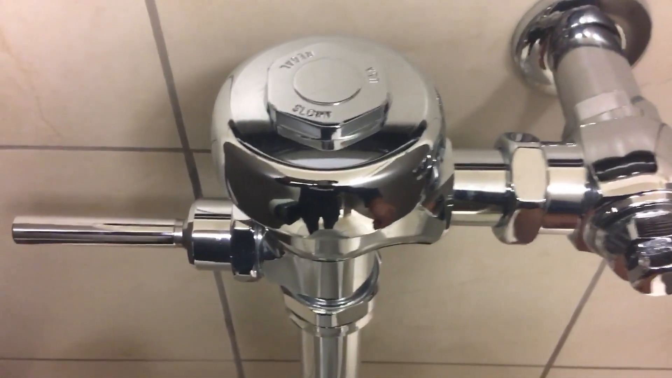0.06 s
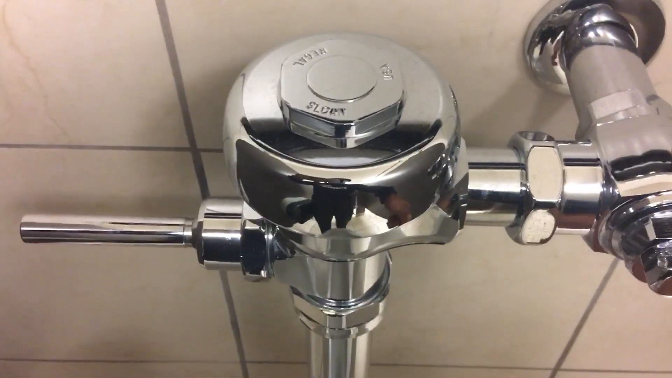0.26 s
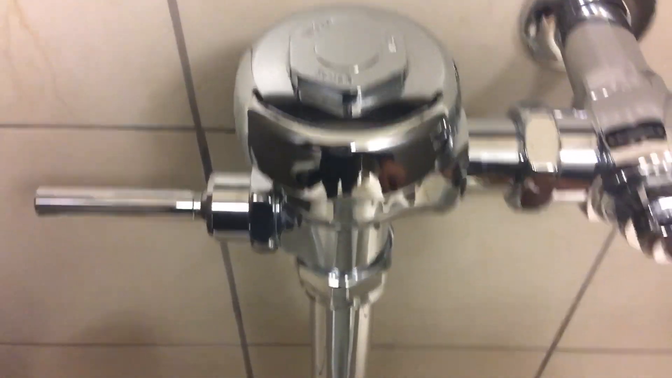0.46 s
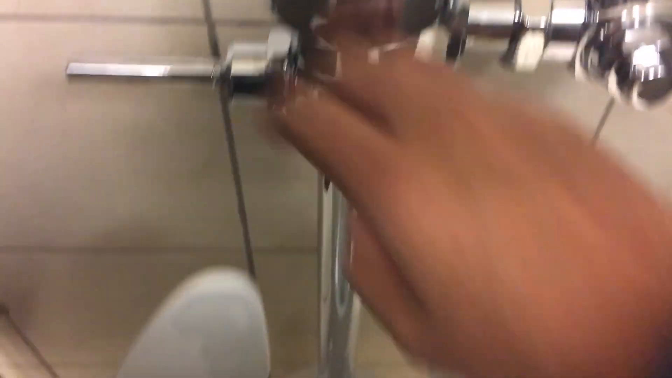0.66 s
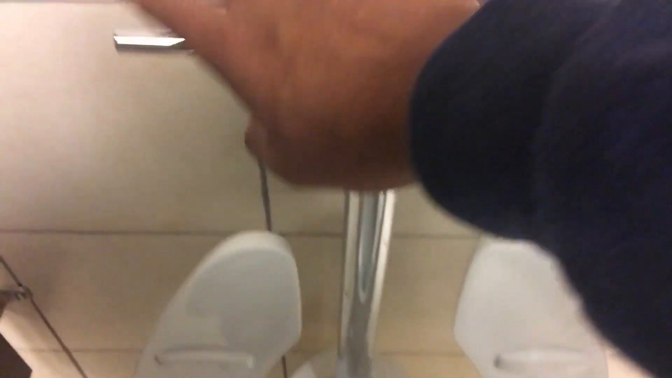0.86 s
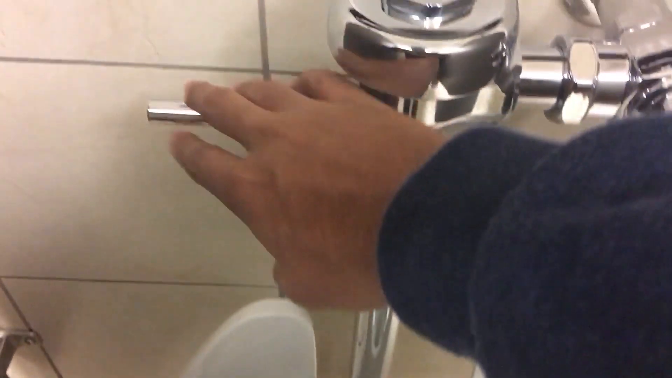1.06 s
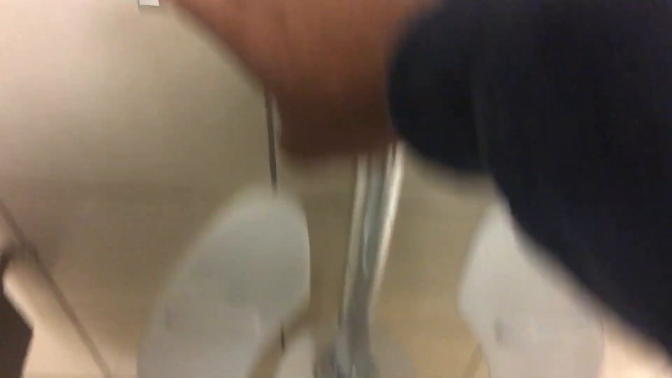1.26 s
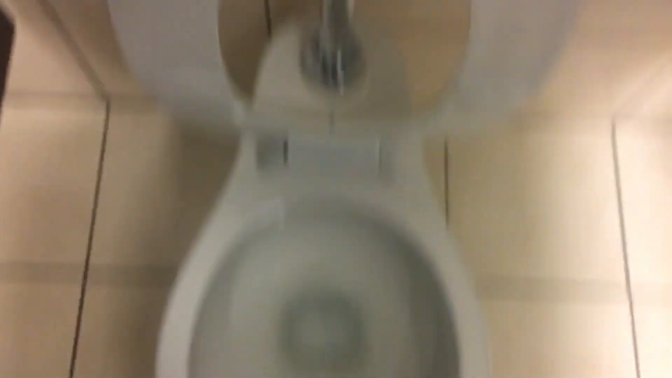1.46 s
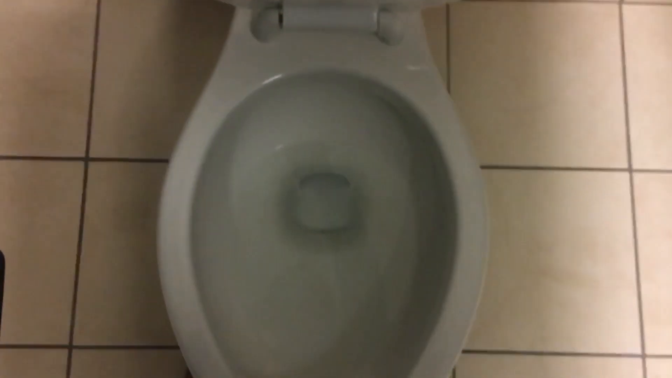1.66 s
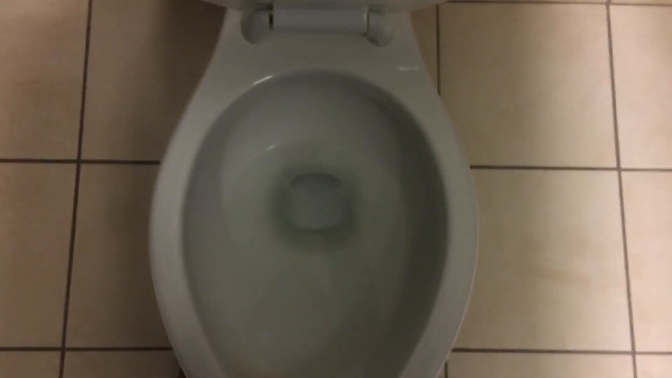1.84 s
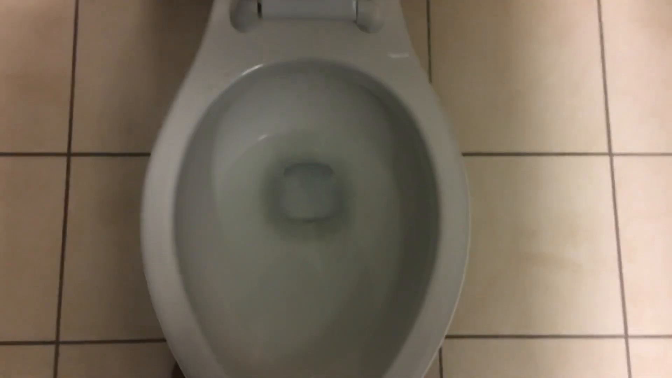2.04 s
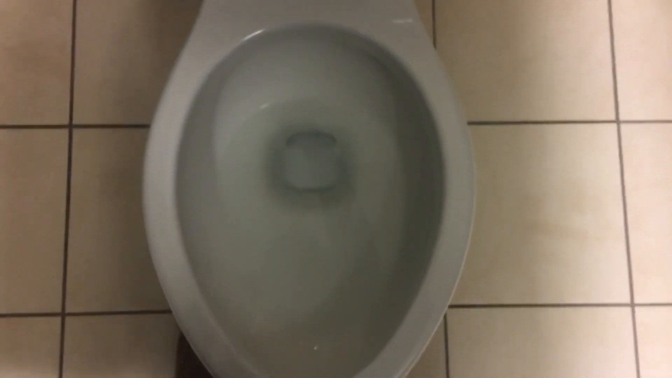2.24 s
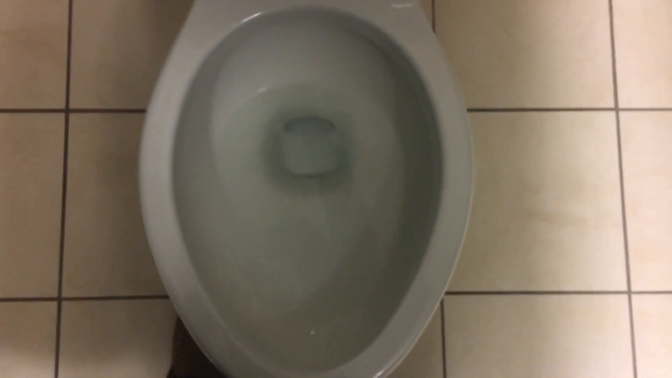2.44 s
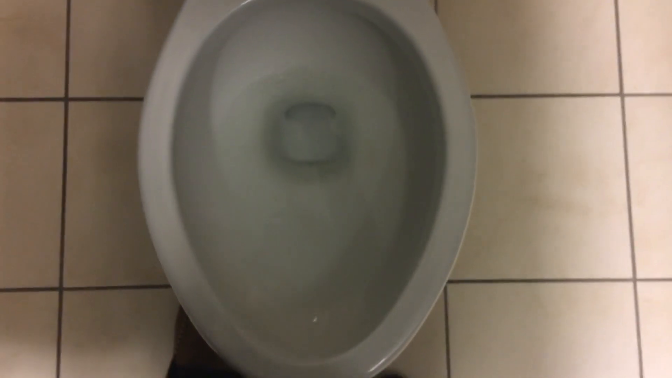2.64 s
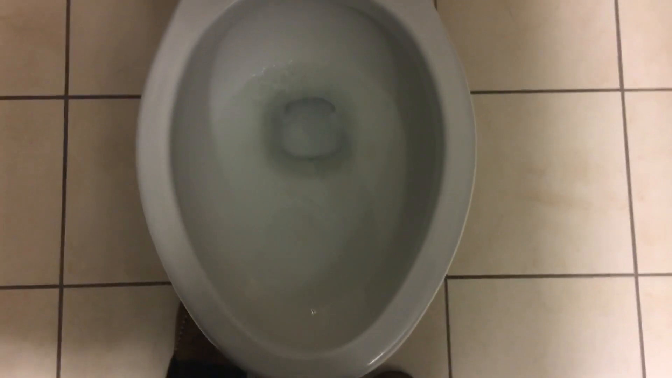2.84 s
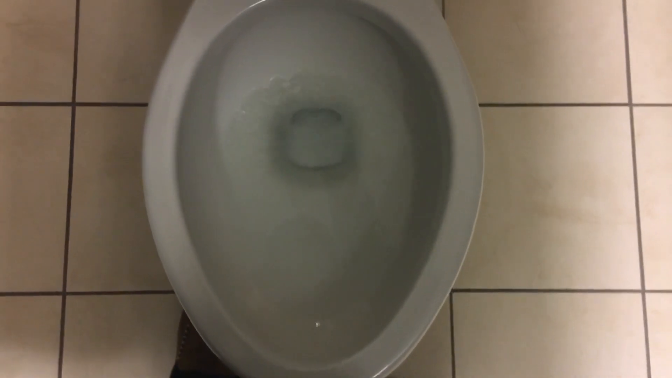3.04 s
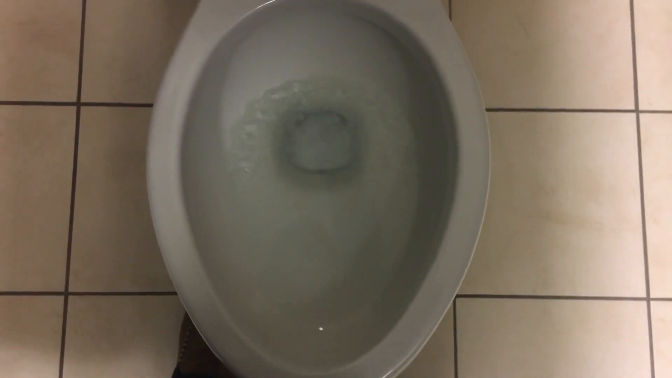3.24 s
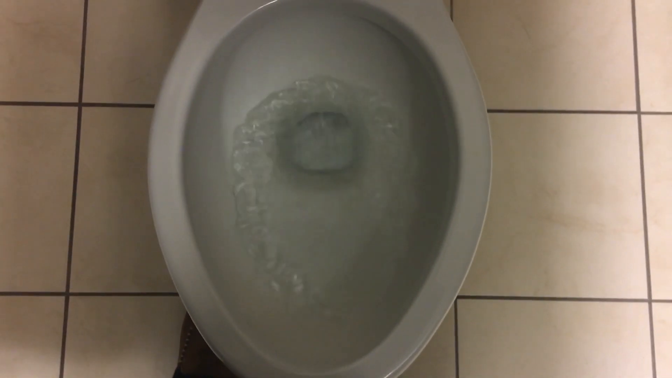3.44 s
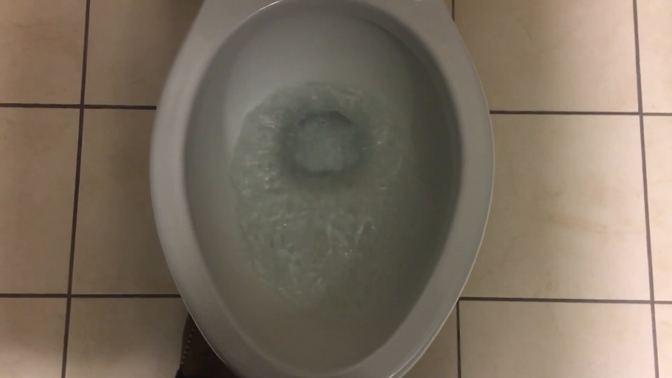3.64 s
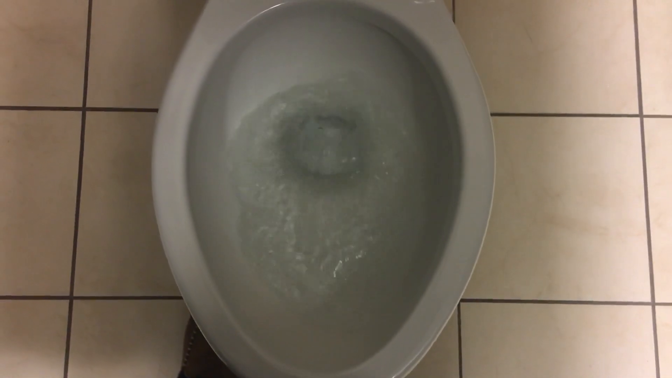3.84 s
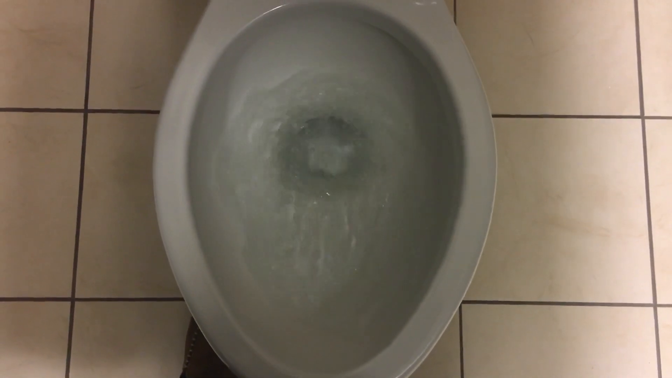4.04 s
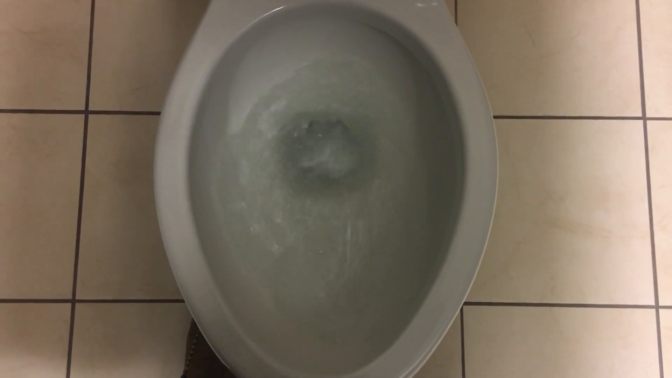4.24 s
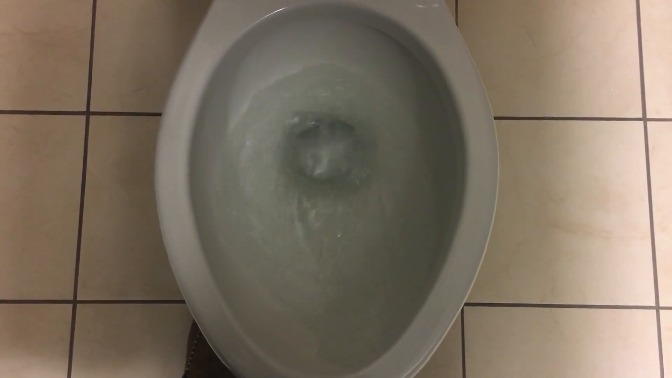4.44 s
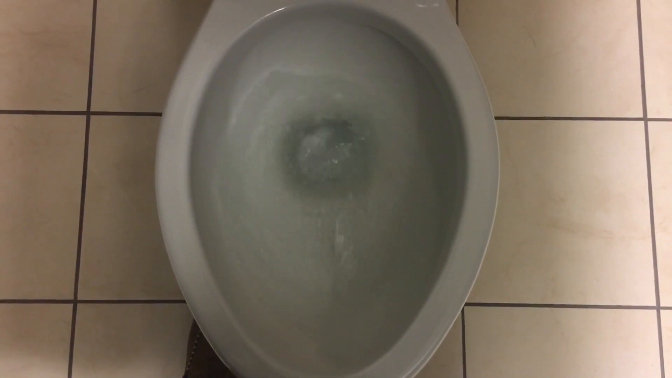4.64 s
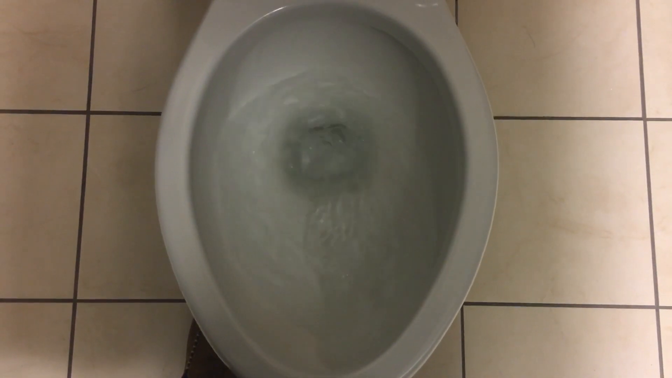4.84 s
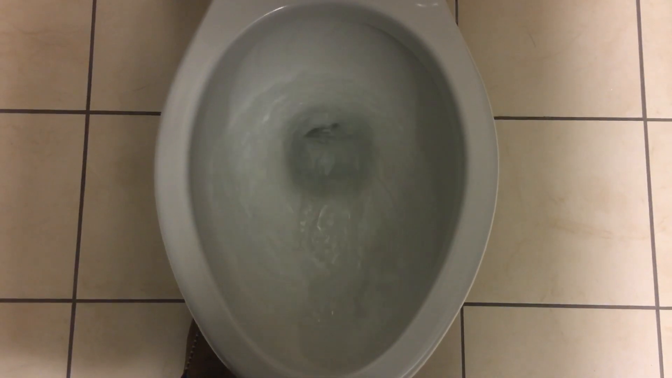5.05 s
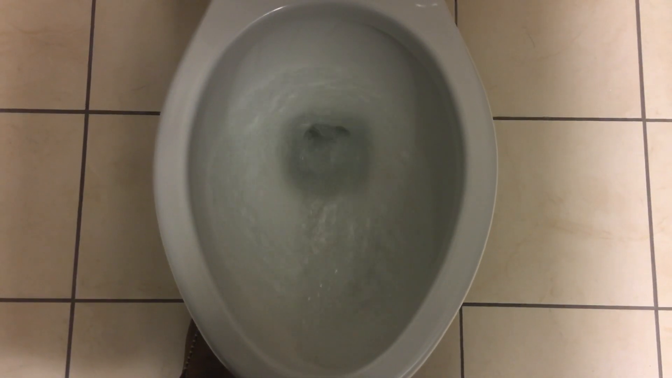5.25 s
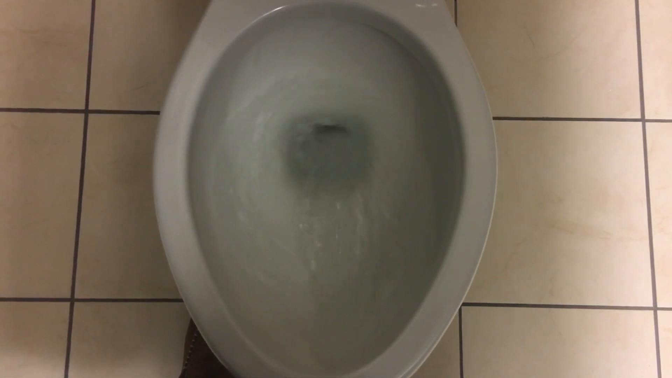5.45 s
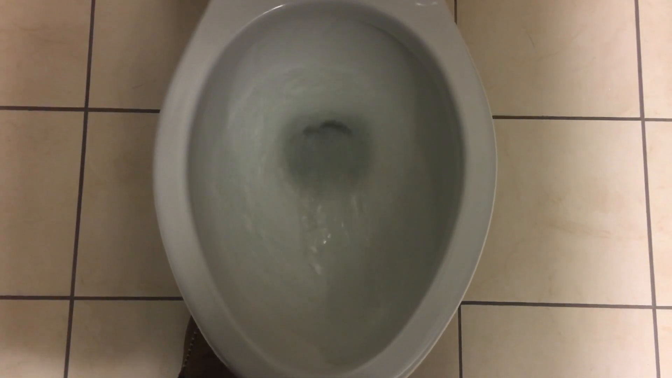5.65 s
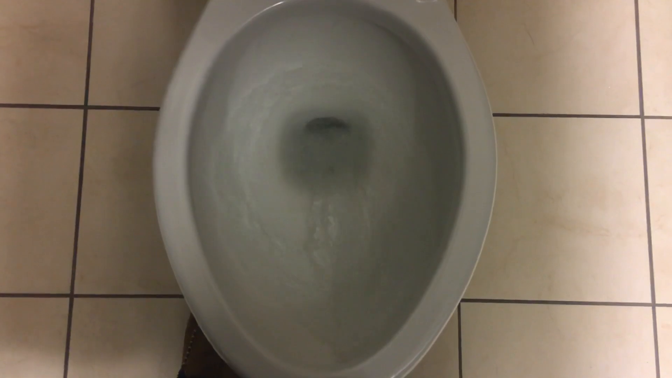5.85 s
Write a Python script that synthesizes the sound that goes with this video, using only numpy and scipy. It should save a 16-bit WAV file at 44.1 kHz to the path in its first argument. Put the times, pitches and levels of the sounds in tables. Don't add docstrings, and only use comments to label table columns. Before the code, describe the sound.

In a small tiled restroom with low ventilation rumble, a sleeve rustles faintly and fingers bump the microphone housing. A metal handle clacks against its stop, the valve hisses and the pipe drones with small knocks. Then water bursts loudly into the porcelain bowl, splashing, ringing and gurgling to the end. Close hand-held mono microphone.

```python
import sys
import numpy as np
from scipy import signal
from scipy.fft import rfft, irfft, next_fast_len
from scipy.io import wavfile
from scipy.ndimage import uniform_filter1d

SR = 44100
rng = np.random.default_rng(int(sys.argv[2]) if len(sys.argv) > 2 else 0)


def int16_out(signal):
    q = np.round(np.clip(np.atleast_2d(signal).T, -1, 1) * 32767)
    wavfile.write(sys.argv[1], SR, q.astype(np.int16))


def attenuation_scalar(level_db):
    decades = np.asarray(level_db, float) / 20
    return 10 ** decades


N = 260190
T = np.arange(N) / SR
HZ, FRAME_S = np.fft.rfftfreq(512, 1 / SR), np.arange(N // 128 + 5) * 128 / SR

VALVE_OPENS_S = 2.02
ARRIVAL_S = (2.72, 3.3)
DRAWDOWN_S = (4.18, 4.64)
# (time [s], spray from valve and rim [dB], sheet in the bowl [dB])
FLOW = [(2.02, -63, -68), (2.11, -47, -48), (2.15, -36, -50), (2.2, -33, -48.5), (2.38, -35.5, -46),
        (2.83, -33.5, -47), (3.11, -38.5, -32.5), (3.23, -36, -25), (3.31, -19.5, -17.5),
        (3.41, -9.5, -12.5), (3.77, -15.5, -13.5), (3.88, -13.5, -13.5), (4.1, -16.5, -18),
        (4.47, -16, -20), (4.74, -19.5, -20), (4.9, -19, -19), (5.06, -20.5, -22), (5.3, -18, -25),
        (5.9, -22, -21)]
FULL_SHEET_DB = -14


def evened(x):
    return x / np.sqrt(np.mean(x ** 2) + 1e-20)


def read(points, hz):
    f, value = np.transpose(points)
    return np.interp(np.log(hz + 1), np.log(f + 1), value)


def add(mix, s, sound):
    part = mix[round(s * SR):][:len(sound)]
    part += sound[:len(part)]


def columns(rows, t):
    s, *rest = np.transpose(rows)
    return [np.interp(t, s, c) for c in rest]


def coloured(x, gain):
    size = next_fast_len(len(x) + 8192)
    return irfft(rfft(x, size) * gain(np.fft.rfftfreq(size, 1 / SR)), size)[:len(x)]


def modes(table, hz):
    return sum(attenuation_scalar(db) / (1 + 2j * (hz - f) / width) for f, width, db in table)


def mode_noise(count, hz, width_hz):
    return evened(coloured(rng.standard_normal(count), lambda f: modes([(hz, width_hz, 0)], f) ** 2))


def smoothed(x, size):
    return uniform_filter1d(uniform_filter1d(x, size), size)


def wander(t, size):
    return evened(smoothed(rng.standard_normal(len(t)), size))


def sung(hz):
    return np.sin(2 * np.pi * np.cumsum(hz) / SR)


def wetness(t):
    return np.interp(t, ARRIVAL_S, (0, 1))


def restless(gain, patchy_db, flicker_db):
    bins, frames = gain.shape
    a, b, patches = rng.standard_normal((frames, bins, 3)).T
    patches = uniform_filter1d(patches, size=8, axis=0)
    patches = evened(uniform_filter1d(patches, size=14, axis=1))
    kicks = np.minimum(rng.exponential(1, frames), 3) - 1
    gusts = evened(signal.lfilter([1], [1, -.72], kicks))
    field = attenuation_scalar(patchy_db * patches + flicker_db * gusts)
    white = a + 1j * b
    shaped = white * gain * evened(field)
    unit = np.sqrt(np.mean(signal.istft(white, nperseg=512, noverlap=384)[1] ** 2) / bins)
    return signal.istft(shaped, nperseg=512, noverlap=384)[1][:N] / unit


def bubbles(per_s, low_hz, high_hz, cycles, spread_db, rise=0.011, turns=24):
    out = np.zeros(N)
    size = attenuation_scalar(spread_db * np.minimum(rng.exponential(1, N), 5)) * (rng.random(N) < per_s / SR)
    kind = rng.integers(0, 24, N)
    for k, hz in enumerate(np.geomspace(low_hz, high_hz, num=24)):
        u = np.arange(int(turns * SR / hz)) * hz / SR
        grain = np.sin(2 * np.pi * u * (1 + rise * u)) * np.exp(-u / cycles)
        grain *= np.minimum(u, 1) * np.sqrt(hz)
        out += signal.oaconvolve(size * (kind == k), grain)[:N]
    return evened(out)


def flow(t):
    # (time [s], spray change [dB], sheet change [dB], half length [s])
    surges = [(2.87, 0, -1, 0.014), (2.92, -1, 4, .012), (2.97, 0, -7, .01), (3.057, 2, 0, .012),
              (3.16, -0.5, -3.5, .018), (3.222, 7, -3, .01), (3.406, -2, -2, 0.067),
              (3.54, -0.5, -2.5, 0.025), (3.608, -2, -1, 0.012), (3.638, -2, -3, 0.053),
              (3.672, 2, -3, 0.018), (3.782, -3.5, -6, 0.03), (3.88, -1.5, 1, 0.018),
              (3.923, -0.5, -1.0, 0.048), (4.015, -3, 3, 0.015), (4.043, 1, -2.5, 0.06),
              (4.147, -1.5, 1.5, 0.068), (4.2, -2, 3, 0.012), (4.253, 2.5, 3, 0.038),
              (4.334, 1.5, 5, 0.013), (4.387, -2.5, 4, 0.021), (4.415, 1, -3, 0.012),
              (4.46, -0.5, 3.5, 0.026), (4.519, 1, 0.5, 0.054), (4.579, -3, -3.5, 0.014),
              (4.642, 2, 3, 0.02), (4.77, 1.5, -3.5, 0.035), (4.836, 2.5, 0, 0.076),
              (4.872, 2.5, -1.5, 0.0084), (4.95, 0, -1.5, 0.012), (5.09, -1, 0.5, 0.024),
              (5.143, 2, 3, 0.029), (5.227, 0, 7, 0.045), (5.312, 0.5, 2, 0.018), (5.387, -2.5, 2, 0.064),
              (5.467, 4, 0, 0.013), (5.478, -4, -5, 0.011), (5.534, -4, 5, 0.013), (5.583, 1, 2, 0.094),
              (5.587, 1, -5, 0.022), (5.634, -3.5, 3, 0.012), (5.694, -3, -1, 0.012), (5.712, 3, 0, 0.011),
              (5.738, -3.5, -8, 0.027)]
    spray_db, sheet_db = columns(FLOW, t)
    gurgle_db = -24.5 + 0.6 * (sheet_db - FULL_SHEET_DB) + 3 * np.interp(t, DRAWDOWN_S, (0, 1))
    gurgle_db += np.interp(t, (DRAWDOWN_S[1], 5.1, 5.49, 5.53), (0, -0.5, -0.5, 0.5))
    s, spray_change, sheet_change, length = np.transpose(surges)
    bump = np.exp(-((t[:, None] - s) / length) ** 2)
    return spray_db + bump @ spray_change, sheet_db + bump @ sheet_change, gurgle_db


def ventilation():
    # (frequency [Hz], level [dB per Hz])
    air = [(100, -16), (300, 5), (500, -5.5), (900, -7), (1830, -13), (3590, -15.5), (4600, -18.5),
           (6000, -16.5), (10000, -16), (15700, -16)]
    # (pitch [Hz], width [Hz], level [dB])
    room = [(58.2, 30, 3.5), (87.7, 15, -2), (132.7, 37, -2), (200, 18, -11), (248.7, 31, -15.5),
            (350, 110, -35), (387, 45, -30.5)]
    a, b = rng.standard_normal((2, N))
    rumble = evened(coloured(a, lambda hz: sum(attenuation_scalar(db) * modes([(f, width, 0)], hz) ** 2
                                               for f, width, db in room)))
    hiss = evened(coloured(b, lambda hz: attenuation_scalar(read(air, hz))))
    return attenuation_scalar(-43) * rumble + attenuation_scalar(-65) * hiss


def sleeve():
    # (frequency [Hz], level [dB per Hz])
    weave = [(350, -37), (600, -1), (1080, -7), (1630, -9), (2050, -11.5), (2770, -9.5), (4470, -13),
             (7610, -9.5), (12400, -9.5), (15700, -13)]
    # (pitch [Hz], width [Hz], level [dB])
    weave_bands = [(2200, 370, 3), (3400, 200, -5), (4450, 250, 7), (5860, 300, 3), (6800, 300, -4),
                   (12500, 1200, 0)]
    # (time [s], cloth speed [dB])
    arm = [(.4, -85), (.53, -80), (.56, -74), (.76, -72), (.92, -66), (1.19, -71.5), (1.27, -67.5),
           (1.47, -79), (1.5, -82)]
    # (time [s], level [dB], length [s])
    grips = [
        (.57, -70, .08),
        (.82, -69, .05),
        (0.95, -48, 0.044),
        (1.08, -45.5, 0.16),
        (1.46, -62, .06),
    ]
    cloth = attenuation_scalar(read(weave, HZ)) * abs(1 + modes(weave_bands, HZ))
    grip = abs(modes([(263, 200, 0)], HZ)) ** 2
    moving = np.clip(np.minimum(FRAME_S - arm[0][0], arm[-1][0] - FRAME_S) / 0.11, 0, 1)
    shifts = sum(attenuation_scalar(db - 14.0) * np.exp(-((FRAME_S - s) / length) ** 2) for s, db, length in grips)
    gain = np.outer(cloth / np.linalg.norm(cloth), attenuation_scalar(columns(arm, FRAME_S)[0] + 4.5))
    gain += np.outer(grip / np.linalg.norm(grip), shifts)
    return restless(gain * moving, patchy_db=2.5, flicker_db=0.5)


def knocks():
    # (time [s], peak [dB], ring [Hz], t60 [s], share of wide crack [0-1])
    dull_knocks = [(.94, -59, 900, .1, .1), (1.007, -57, 1150, .067, .02), (1.084, -48, 900, 0.073, .02),
                   (1.963, -58, 4200, .1, 0.1), (1.966, -56, 2200, 0.14, .02), (2.030, -58, 5500, .3, .02),
                   (2.065, -24, 3600, 0.063, 0.9), (2.066, -44, 696, .12, 0.2),
                   (2.183, -32, 1500, 0.041, 0.3), (2.483, -38, 5500, .06, 0.07),
                   (2.595, -31.5, 2200, 0.081, 0.4), (2.636, -29, 2200, .09, 0.8),
                   (2.741, -33.5, 2300, 0.071, 0.5), (2.94, -34, 3300, 0.04, 0.1),
                   (3.179, -25, 7200, .05, .02), (3.206, -19, 3700, 0.046, .02),
                   (2.181, -26.5, 13000, 0.091, 0.02)]
    # (time [s], peak [dB], ring [Hz], width [Hz], t60 [s])
    rings = [(.036, -66, 1340, 90, .44), (.085, -65, 2650, 450, .15), (.085, -69, 2330, 250, .3),
             (.105, -71, 1330, 60, .2), (.33, -68, 885, 80, .2), (.46, -71, 4400, 300, .1),
             (1.618, -62, 1800, 200, .2), (1.64, -70.5, 1750, 140, 1.4), (1.732, -66, 890, 120, .08),
             (1.625, -70, 3050, 200, .3), (1.969, -52.5, 930, 260, 0.27), (2.030, -59, 1580, 200, .35),
             (2.091, -47, 500, 120, 1.4), (2.18, -47, 920, 70, 0.14), (2.18, -47, 1530, 70, .15),
             (3.6, -30, 560, 90, 0.46), (3.78, -35, 645, 30.3, 0.19), (4.86, -30, 680, 70, 0.14),
             (5.39, -36, 620, 100, 0.13), (5.548, -24, 3200, 200, 0.42), (5.56, -23.5, 1385, 60, 0.21),
             (5.76, -33, 500, 100, 0.15), (4.965, -22, 1046, 40, 0.3), (4.956, -36, 604, 90, 0.13),
             (5.205, -29, 498, 162, 0.16), (5.525, -32, 800, 300, 0.68), (5.525, -30, 504, 80, 0.15),
             (5.715, -34, 486, 120, 0.32), (2.064, -39, 9300, 1500, .06), (2.064, -48, 6200, 1200, .08),
             (4.97, -24, 12100, 500, .25), (5.11, -23, 8250, 900, 0.28), (5.2, -26, 11900, 400, .4),
             (5.8, -31.5, 680, 120, .2), (5.8, -29.5, 930, 200, 0.88), (5.58, -28, 970, 150, 0.35),
             (1.085, -52, 1120, 110, 0.11), (1.085, -59, 1510, 90, .1)]
    out, t = np.zeros(N), np.arange(24000) / SR
    dull = [(s, db, hz, hz / 2.2, t60, crack) for s, db, hz, t60, crack in dull_knocks]
    narrow = [(s, db, hz, width, t60, 0.09) for s, db, hz, width, t60 in rings]
    for s, db, hz, width, t60, crack in dull + narrow:
        ring = mode_noise(len(t), hz, width) * attenuation_scalar(-60 * t / t60)
        burst = mode_noise(len(t), 2900, 3900) * attenuation_scalar(-60 * t / 0.048)
        add(out, s, attenuation_scalar(db) * ((1 - crack) * ring + crack * burst) * np.minimum(t / 0.0047, 1))
    tick = mode_noise(len(t), 12500, 5100)
    add(out, 1.0917, attenuation_scalar(-42 - 60 * t / 0.0052) * tick)
    bump = np.sin(2 * np.pi * 110 * t * (1 - 3 * t)) * np.minimum(t / 0.0041, 1)
    add(out, 1.093, attenuation_scalar(-33 - 60 * t / 0.37) * bump)
    return out


def clack():
    # (pitch [Hz], level [dB], t60 [s])
    brass = [(1120, -8, 0.095), (1520, -4, 0.044), (1960, -1, 0.03), (2239, -3, 0.075), (2374, -9, 0.09),
             (3009, -21, 0.12), (3860, -18, 0.11), (4194, -10, 0.06), (4807, -11, 0.015),
             (5800, -18, 0.044)]
    out, t = np.zeros(N), np.arange(8000) / SR
    ring = sum(attenuation_scalar(db - 60 * t / t60) * np.sin(2 * np.pi * (hz * t + rng.random())) for hz, db, t60 in brass)
    add(out, 2.0662, attenuation_scalar(-31.5) * ring * np.minimum(t / 0.00089, 1))
    return out


def slugs():
    # (time [s], length [s], level [dB], from [Hz], to [Hz])
    slides = [
        (2.04, 0.25, -27.5, 147.7, 118),
        (2.105, 0.13, -41.5, 322.5, 265),
        (2.237, 0.13, -40, 287.3, 251.5),
        (3.052, 0.22, -31, 129.6, 144),
        (3.2, 0.15, -28, 144, 120),
    ]
    out = np.zeros(N)
    for s, length, db, from_hz, to_hz in slides:
        u = np.arange(0, 1, 1 / (length * SR))
        add(out, s, attenuation_scalar(db) * np.sin(np.pi * u ** 0.75) * sung(from_hz + (to_hz - from_hz) * u))
    return out


def pipe():
    # (time [s], tone level [dB], turbulence level [dB])
    drive = [(2.0, -41, -52), (2.05, -36, -33.5), (2.17, -28.5, -33.5), (2.3, -34.5, -35.5),
             (2.48, -29.5, -38), (2.56, -54, -39), (2.63, -31.5, -40), (2.86, -29, -37.5),
             (3.04, -32.5, -37), (3.24, -27, -33.5), (3.56, -38.5, -42.5), (3.72, -36, -51),
             (3.8, -42.5, -50), (4.65, -48.5, -52), (5.01, -37.5, -51), (5.25, -48, -48.5),
             (5.45, -38.5, -62), (5.9, -40, -57)]
    # (time [s], pitch [Hz])
    tone_pitch = [(2.1, 103.6), (2.2, 88), (2.29, 101.6), (2.38, 88.1), (2.55, 93.2), (2.8, 89.4),
                  (3.0, 91.7)]
    # (pitch [Hz], width [Hz], level [dB])
    upper_modes = [(216, 9.6, -10), (265, 11.2, -1), (300, 56, -3.5), (326, 15, -16)]
    # (time [s], level [dB])
    trap_level = [(3.2, -67), (3.37, -33.5), (3.45, -53), (3.55, -38), (3.72, -43), (3.85, -58), (4.0, -42),
                  (4.1, -56), (4.25, -42.5), (4.5, -43), (4.6, -49), (5.9, -54.5)]
    wet = wetness(T)
    tone_db, turbulence_db = columns(drive, T)
    sag_db = 4 * np.maximum(T - ARRIVAL_S[1], 0)
    above_db = turbulence_db + wet * wander(T, size=3000)
    under_db = np.interp(T, (2.37, 3.1), (-31.5, -46)) - sag_db + wander(T, size=3000)
    rush_db = 8.5 * wet * np.where(T > DRAWDOWN_S[0], .4, 1)
    upper_db = -43.5 + 0.41 * (turbulence_db + 36.5) + rush_db - 0.33 * sag_db

    waver_hz = 6.38 / 3 * wander(T, size=3000)
    tone = np.sqrt(2) * sung(columns(tone_pitch, T)[0] + waver_hz)
    above = mode_noise(N, 136.0, 47)
    under = mode_noise(N, 68.6, 30)
    upper = evened(coloured(rng.standard_normal(N), lambda f: sum(
        attenuation_scalar(db) * modes([(hz, 2.33 * width, 0)], f) ** 2 for hz, width, db in upper_modes)))
    trap = np.sqrt(2) * sung(385 + 4.99 * wander(T, size=900))
    layers = attenuation_scalar(tone_db) * tone + attenuation_scalar(above_db) * above + attenuation_scalar(under_db) * under + attenuation_scalar(upper_db) * upper
    layers += attenuation_scalar(columns(trap_level, T)[0]) * wet * trap
    return layers * np.clip((T - VALVE_OPENS_S) / 0.044, 0, 1)


def whistle():
    # (time [s], pitch [Hz], level [dB])
    glide = [(2.52, 5610, -60), (2.6, 5480, -53), (2.64, 5750, -44), (2.675, 5820, -40), (2.695, 5960, -52),
             (2.715, 6150, -48), (2.76, 6500, -46), (2.8, 6800, -54)]
    hz, db = columns(glide, T)
    fuzz = 0.88 + 0.75 * evened(uniform_filter1d(rng.standard_normal(N), size=260))
    return attenuation_scalar(db) * fuzz * sung(hz) * (T > glide[0][0]) * (T < glide[-1][0])


def song():
    # (pitch [Hz], level at full sheet [dB], start [s], end [s])
    pockets = [(1352, -35, 3.28, 3.6), (1284, -32, 3.275, 3.75), (1338, -33, 3.72, 4.05),
               (1596, -34, 3.3, 4.25), (1578, -33.5, 4.14, 4.45), (1015, -38, 3.62, 4.0),
               (1040, -38, 4.18, 4.4), (1238, -32, 4.72, 5.14), (1350, -36, 4.45, 5.14),
               (1062, -35, 4.78, 5.05)]
    sheet_db, out = columns(FLOW, T)[1] - FULL_SHEET_DB, np.zeros(N)
    for hz, db, start, end in pockets:
        tone = sung(hz + 15.9 * wander(T, size=500))
        held = np.clip(np.minimum((T - start) / 0.038, (end - T) / 0.16), 0, 1)
        out += attenuation_scalar(db + 0.48 * sheet_db + 2.5 * wander(T, size=1200)) * held * tone
    return out


def glugs():
    # (time [s], peak [dB], pitch [Hz])
    large = [(5.156, -8.5, 910), (5.207, -8, 647), (5.403, -12, 1150), (5.522, -13, 796),
             (5.565, -19, 1330), (4.449, -10, 1040), (4.794, -11, 1220), (5.335, -13, 1070),
             (5.671, -29, 1360), (5.831, -13, 1150), (5.151, -12, 1190), (5.61, -15, 1730),
             (5.72, -16, 477), (5.72, -8.5, 1130), (5.741, -12, 846)]
    out, t = np.zeros(N), np.arange(6000) / SR
    for s, db, hz in large:
        tone = np.sin(2 * np.pi * hz * t * (1 + 1.7 * t))
        add(out, s, attenuation_scalar(db - 8 - 60 * t / 0.05) * tone * np.minimum(t / 0.0013, 1))
    return out


def slaps():
    # (time [s], peak [dB], t60 [s], centre [Hz])
    hits = [(2.898, -30, 0.034, 2010), (2.887, -29.5, 0.026, 2360), (2.938, -28, 0.038, 3550),
            (2.974, -28, 0.044, 2400), (3.035, -27, 0.03, 2900), (3.135, -26, 0.03, 3500),
            (3, -31, 0.048, 2930), (3.025, -35, 0.18, 2400), (3.0675, -27.5, 0.19, 2920),
            (3.1004, -22.5, 0.061, 3470), (3.1795, -26, 0.09, 2500), (3.209, -17, 0.039, 2920),
            (3.2376, -27, 0.11, 2300), (3.26, -21, 0.2, 2310), (3.294, -8.5, 0.046, 4400),
            (3.908, -5, .03, 10000), (4.1928, -4, 0.052, 9000), (4.34, -4, 0.036, 8000),
            (4.5325, -10, 0.046, 3230), (4.557, -5, 0.037, 8000), (4.6172, -7.5, 0.044, 9000),
            (4.776, -10.5, 0.059, 5740), (4.979, -11, 0.048, 11970), (5.002, -8, 0.033, 12000),
            (5.111, -8, 0.034, 9600), (5.332, -6.5, 0.037, 12200), (5.462, -8, .04, 12500),
            (4.92, -1.5, 0.05, 6740), (5.231, -10, 0.11, 5550), (5.4075, -0.5, 0.031, 7580),
            (5.446, -8, 0.039, 5530), (5.5105, -10.5, 0.074, 8180), (5.57, -9, 0.081, 6160),
            (5.7788, -4.5, 0.032, 6460), (5.8081, -3.5, 0.066, 6160)]
    out, t = np.zeros(N), np.arange(6000) / SR
    for s, db, t60, hz in hits:
        slap = mode_noise(len(t), hz, 0.9 * hz)
        add(out, s, attenuation_scalar(db - 5.5 - 60 * t / t60) * slap * np.minimum(t / 0.00062, 1))
    return out


def droplets():
    spray_db = np.interp(T, FRAME_S, flow(FRAME_S)[0])
    level = attenuation_scalar(spray_db - 7.5) * np.interp(T, DRAWDOWN_S, (.6, 1))
    sings = bubbles(250, 4500., 14480.0, cycles=88.0, spread_db=2.5, rise=0.00039, turns=100)
    return wetness(T) * level * sings


def water():
    # (frequency [Hz], level [dB per Hz])
    hiss = [(300, 6), (500, 0.5), (1000, -6.5), (2500, 3), (5000, -9), (8000, -12), (12000, -8),
            (14000, -4.5), (15700, -7.5)]
    # (frequency [Hz], level [dB per Hz])
    bowl_rush = [(300, 9), (500, -13), (900, -3.5), (1500, -2), (3000, -6.5), (5000, -1.5), (6000, 1.5),
                 (9000, -1), (12200, -2.5), (14500, -4.5), (15700, -7.5)]
    arrived = wetness(FRAME_S)
    shape = attenuation_scalar(np.outer(read(hiss, HZ), 1 - arrived) + np.outer(read(bowl_rush, HZ), arrived))
    low = 1 / (1 + (HZ / 1500) ** 8)
    high = 1 / (1 + (5000 / (HZ + 1)) ** 16)
    bottom = 1 / (1 + (400 / (HZ + 1)) ** 8)
    spray_db, sheet_db, gurgle_db = flow(FRAME_S)
    slosh_db = arrived * np.interp(FRAME_S, DRAWDOWN_S, (0.4, 0.35))
    layers = ((high, spray_db + 0.1), (1 - low - high, sheet_db - 3.0), (low * bottom, gurgle_db - 6.0))
    power = 0
    for band, db in layers:
        part = shape ** 2 * np.clip(band, 0, 1)[:, None]
        power = power + part / part.sum(0) * attenuation_scalar(db + slosh_db * wander(FRAME_S, size=4)) ** 2
    rush = restless(np.sqrt(power) * (FRAME_S > VALVE_OPENS_S), patchy_db=0.84, flicker_db=1.06)

    spray_db, gurgle_db = np.interp(T, FRAME_S, spray_db), np.interp(T, FRAME_S, gurgle_db)
    fizz = attenuation_scalar(spray_db - 7.0) * bubbles(2500, 2106.0, 13540.0, cycles=2.7, spread_db=3.0)
    stirred = np.interp(T, DRAWDOWN_S, (.3, 1))
    gurgle = stirred * attenuation_scalar(gurgle_db - 8) * bubbles(300, 480., 1900., cycles=6., spread_db=3.)
    return rush + wetness(T) * (fizz + gurgle)


def bowl(x):
    # (pitch [Hz], width [Hz], level [dB])
    valve_body = [(1070, 230, 12), (1540, 41, 10.5), (2070, 60, 8), (2260, 220, 2), (2420, 60, 5),
                  (2920, 72, 2), (3630, 220, 7.5), (4130, 110, 8), (5620, 81, 3), (6840, 150, 6),
                  (7470, 180, 3), (8550, 110, 7), (9260, 190, 7), (12400, 340, -7)]
    # (pitch [Hz], width [Hz], level [dB])
    full_bowl = [(680, 190, 11), (1003, 66, 14), (1272, 45, 16.5), (1350, 44, 17), (1595, 34, 13),
                 (1043, 45, 7), (1970, 29, 10), (2300, 150, 4), (2930, 190, 8.5), (3510, 60, 4),
                 (4430, 64, 3), (8000, 63, -3)]
    # (centre [Hz], width [Hz], part taken out [dB])
    full_dips = [(910, 90, -3.5), (1150, 196, -3), (1482, 253, -1), (2700, 190, -6)]
    # (pitch [Hz], width [Hz], level [dB])
    low_bowl = [(665, 12.5, 8), (810, 11.5, 6), (1070, 53, 6), (1210, 100, -10.5), (1360, 150, 0.5),
                (1660, 72, -1), (1965, 30, 2), (2316, 44, 4), (2590, 230, 0.5), (2920, 107, 5),
                (3230, 97, 6), (3600, 44, 2.5), (3730, 94, -10), (4356, 61, 2.5)]
    # (pitch [Hz], width [Hz], level [dB])
    rim_pocket = [(1245, 23, 2.1), (1344, 24, 1.1)]

    def direct(f, share):
        return share + (1 - share) / (1 + (4500 / (f + 1)) ** 4)

    wet, low = wetness(T), np.interp(T, DRAWDOWN_S, (0, 1))
    valve = coloured(x, lambda f: 0.7 + 0.44 * modes(valve_body, f))
    full = coloured(x, lambda f: (direct(f, 0.61) + 0.38 * modes(full_bowl, f)) * (1 - modes(full_dips, f)))
    drawn = coloured(x, lambda f: direct(f, 0.43) + 0.53 * modes(low_bowl, f))
    pocket_open = np.interp(T, (4.3, 4.45, 5.06, 5.16), (0, 1, 1, 0))
    pocket = pocket_open * coloured(x, lambda f: modes(rim_pocket, f))
    return (1 - wet) * valve + wet * ((1 - low) * full + low * drawn + pocket)


def tiles(x):
    t60_s, tail_db = 0.58, -14.5
    taps = np.zeros(SR // 2)
    at = np.arange(140, len(taps) - 20, 20)
    at = at + rng.integers(0, 20, len(at))
    taps[at] = rng.choice([-1., 1.], len(at)) * attenuation_scalar(-60 * at / SR / t60_s)
    taps = coloured(taps, lambda f: modes([(0, 9800, 0)], f) ** 2)
    tail = signal.fftconvolve(x, taps / np.linalg.norm(taps))[:N]
    return (x + attenuation_scalar(tail_db) * tail) / np.sqrt(1 + attenuation_scalar(tail_db) ** 2)


def scene():
    background = ventilation() + sleeve() + knocks() + clack()
    plumbing = slugs() + pipe() + song()
    in_bowl = bowl(water() + slaps() + droplets())
    mono = background + plumbing + tiles(whistle() + glugs() + in_bowl)
    return np.array([mono, mono])


def top_cut(x):
    return signal.sosfilt(signal.butter(12, 17030, fs=SR, output="sos"), x)


def record(dry):
    # (centre [Hz], width [Hz], part taken out [dB])
    housing_dips = [(4830, 860, -9), (7490, 1770, -8), (10450, 570, -5.5)]
    edge_hz = 15750
    heard = dry[0] / (1 + dry[0] ** 6) ** (1 / 6)
    heard = coloured(heard, lambda f: (1 - modes(housing_dips, f)) * np.clip((edge_hz - f) / 60, 0, 1))
    return top_cut(np.array([heard, heard]))


dry = scene()
out = record(dry)
int16_out(out)
```